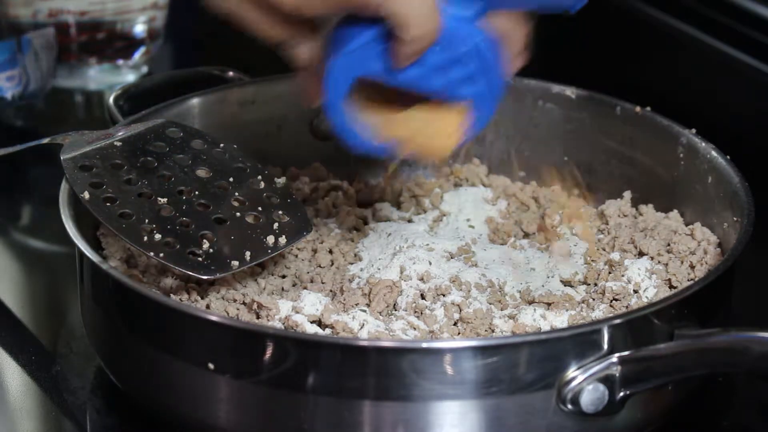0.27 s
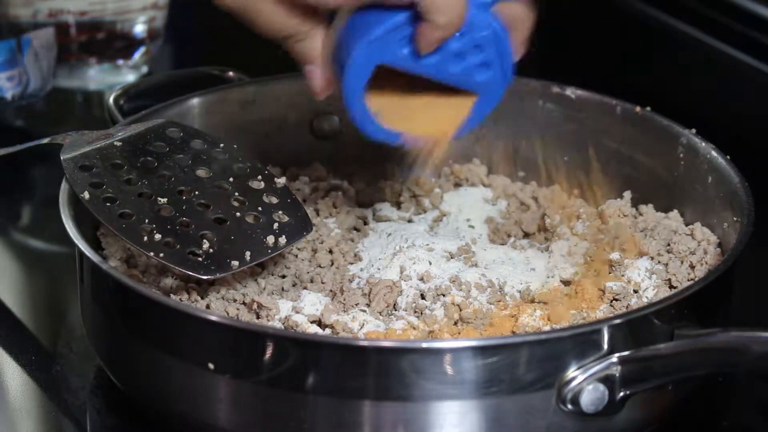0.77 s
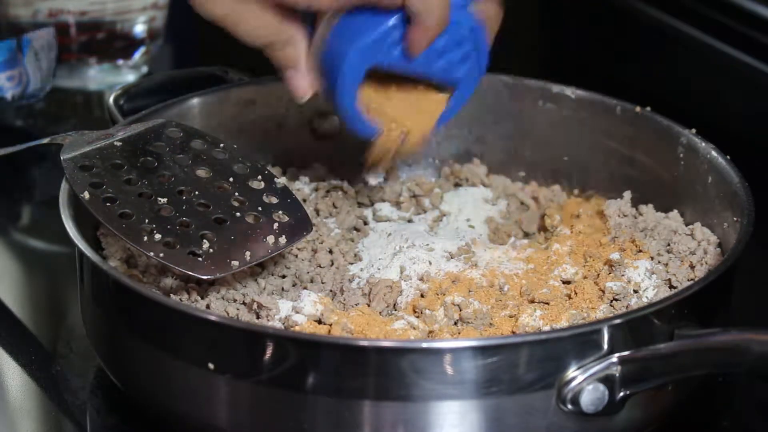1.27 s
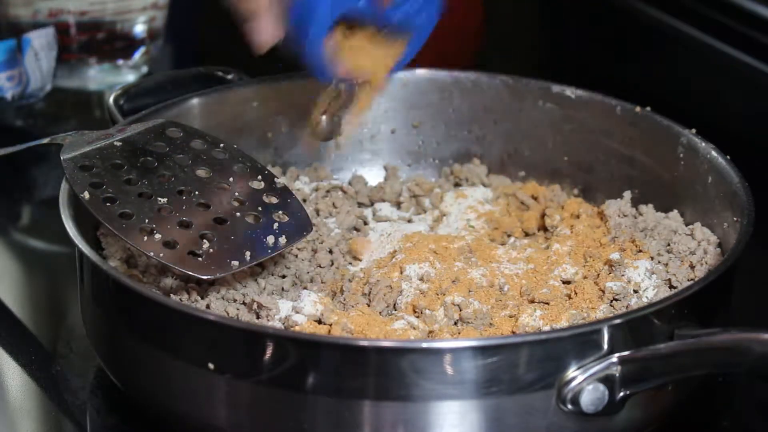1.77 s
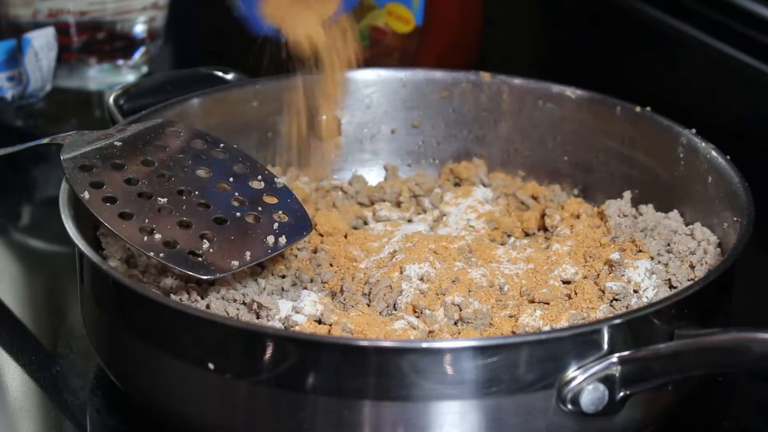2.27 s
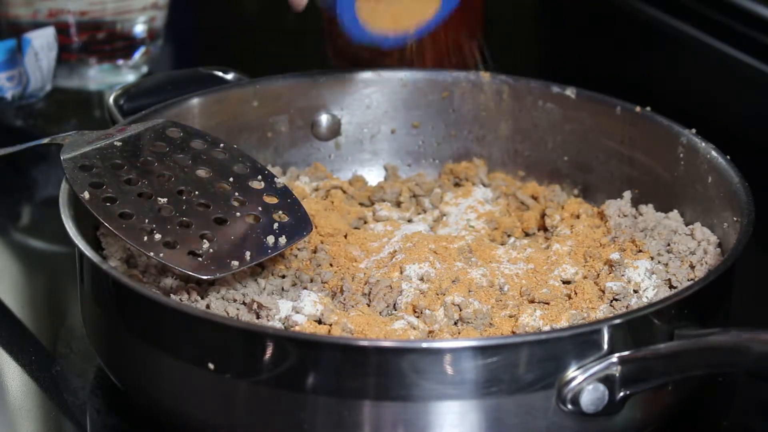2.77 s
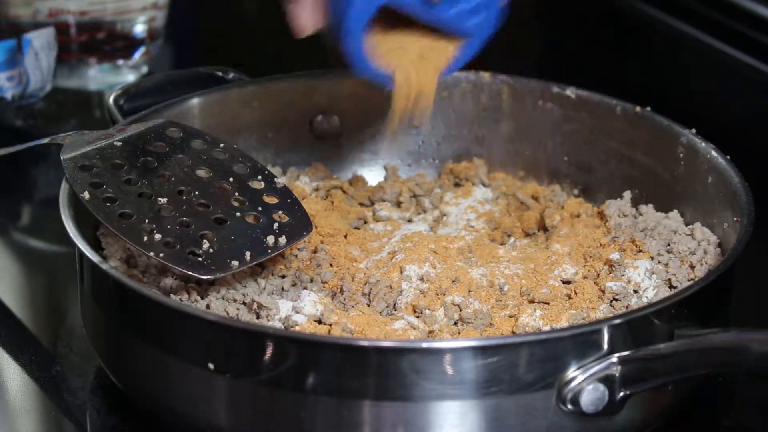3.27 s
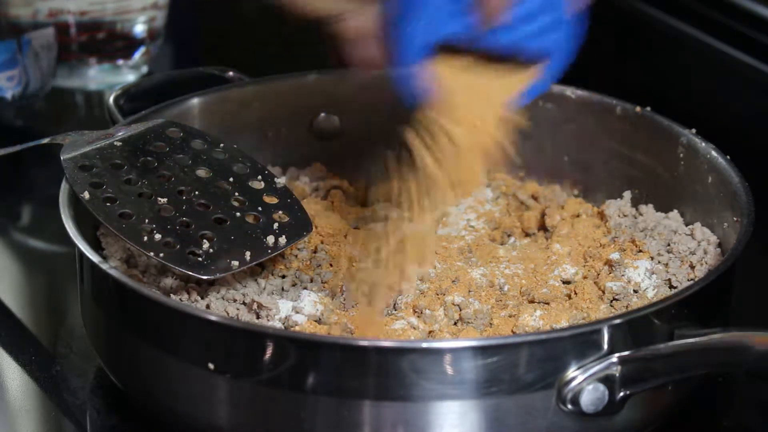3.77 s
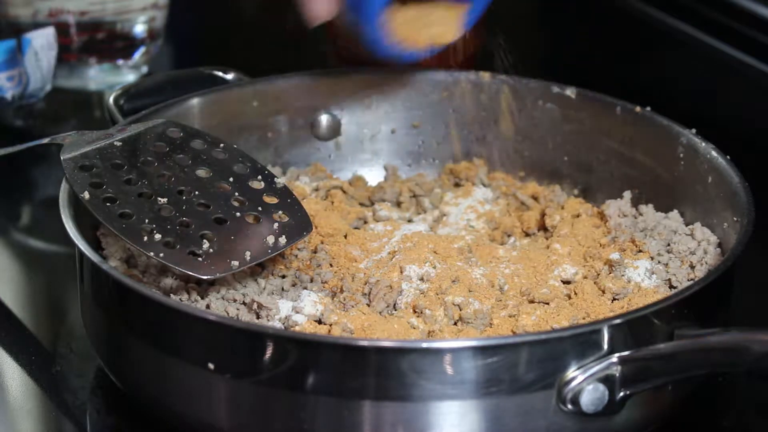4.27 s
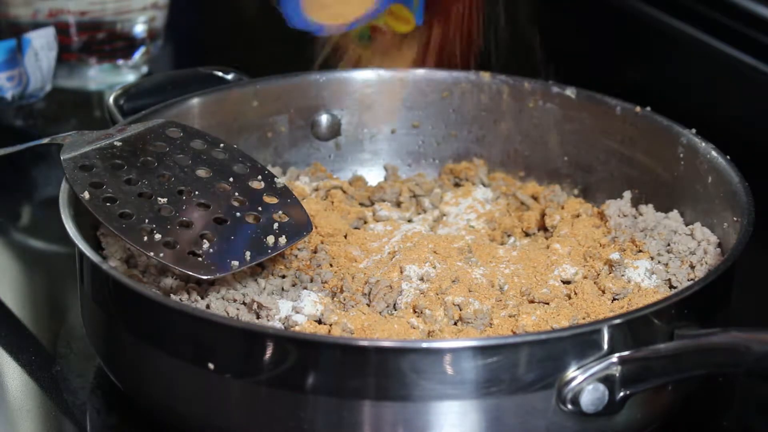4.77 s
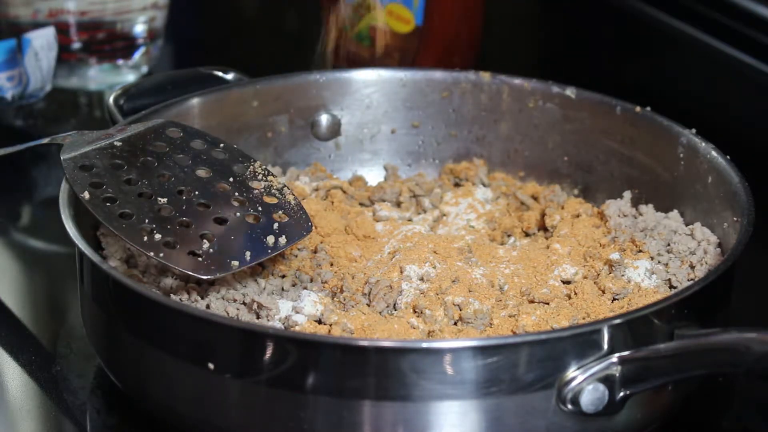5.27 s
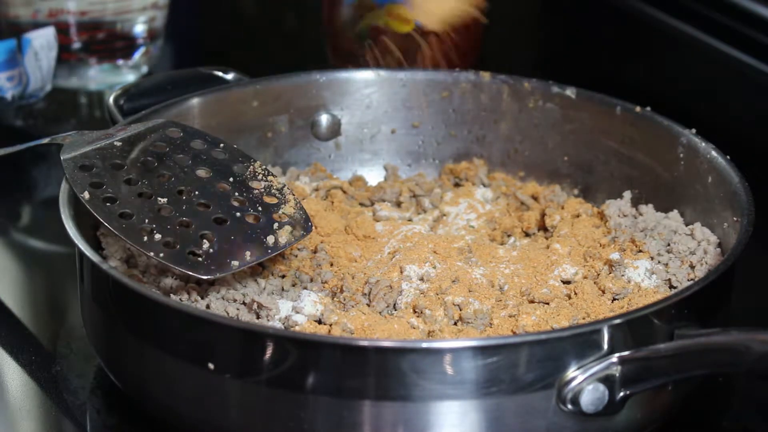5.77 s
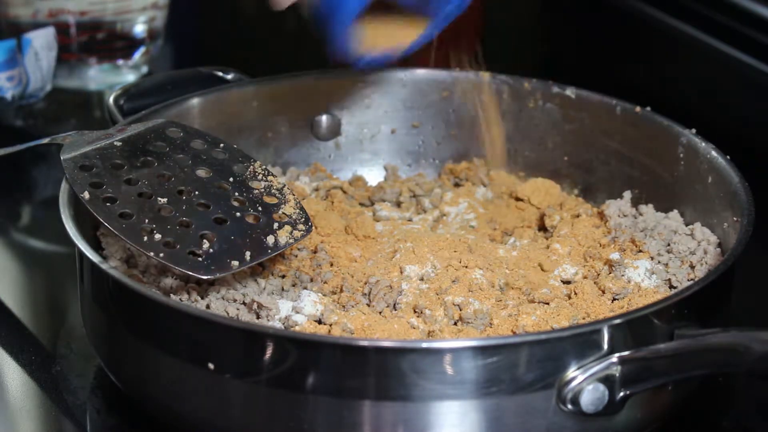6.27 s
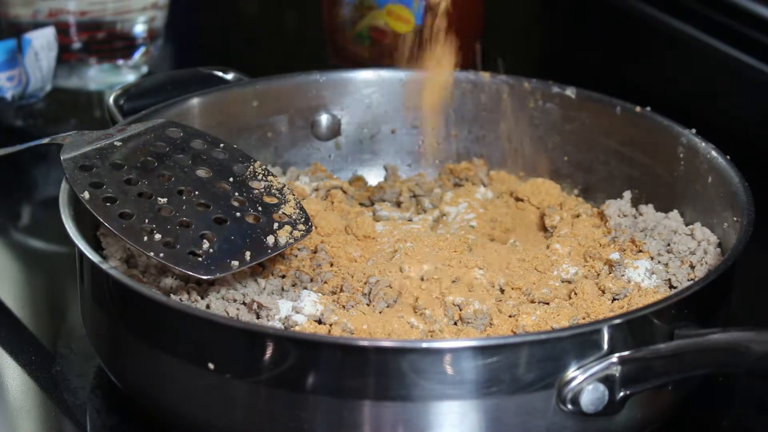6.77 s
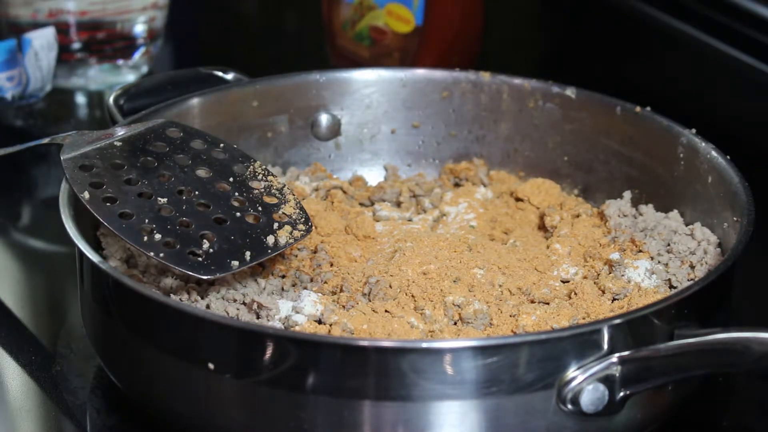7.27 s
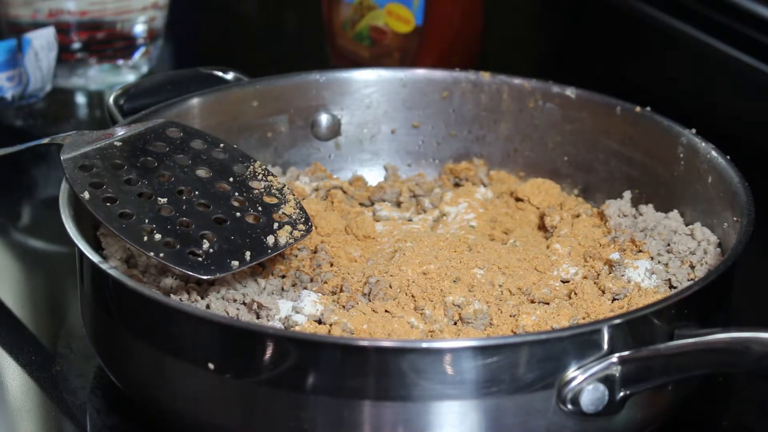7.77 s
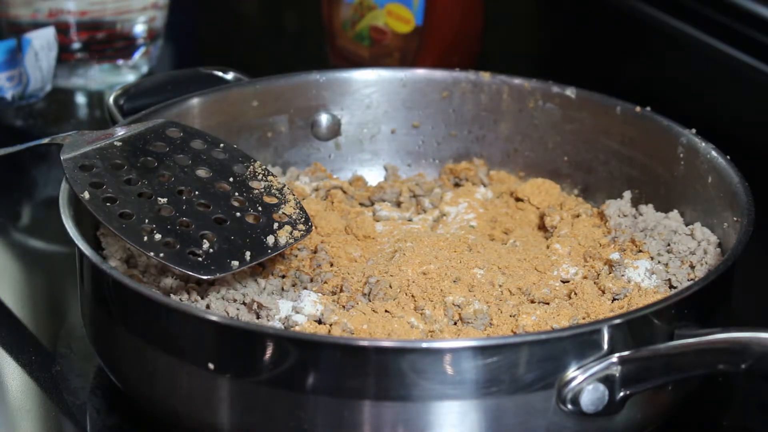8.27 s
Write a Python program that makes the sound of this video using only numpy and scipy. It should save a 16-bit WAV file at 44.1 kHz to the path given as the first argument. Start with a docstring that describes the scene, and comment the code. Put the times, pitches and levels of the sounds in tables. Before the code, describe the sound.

Close, centred sound in a small home kitchen with a low, slightly pulsing fan drone. Fine grains swish in a paper packet about nine times a second, bright and dry, with brief gaps, dull hand bumps and crackles. Later come irregular tips and squeezes, and the packet wall buckles with muted pops. Near the end a sudden overloaded double clack on metal rings briefly, then a heavy low rolling rumble.

```python
"""A kitchen fan hums throughout: coloured air noise, two beating hums and wavering tones.
From the start spice powder is shaken from a paper packet, about nine strokes a second: grain noise under
stroke envelopes, with dull bumps, crackling creases and, at 1.4 s, one tap of damped modes.
From 6.3 s tips and squeezes empty the packet; from 7.3 s it pops softly: short noise bands.
At 8.1 s a hard object clacks twice on metal, limited and clipped; a low rumble of merged bumps follows."""
import sys
import numpy as np
from scipy import signal
from scipy.fft import rfft, irfft, next_fast_len
from scipy.io import wavfile

SR = 44100
rng = np.random.default_rng(int(sys.argv[2]) if len(sys.argv) > 2 else 0)


def transcribe(u):
    """Save the signal u as a 16-bit wav file named by the first command-line argument.

    u: samples, shape (n,) or (channels, n), limited to [-1, 1]; the rate is SR.
    q: integer samples, one column per channel.
    """
    v = np.clip(np.atleast_2d(u).T, -1, 1)
    q = np.round(v * 32767).astype(np.int16)
    wavfile.write(sys.argv[1], SR, q)


N = 376173
TIME = np.arange(N) / SR


def amp(db):
    """Amplitude factor of a level in dB."""
    return 10 ** (np.asarray(db) / 20)


def unit(x):
    """Scales to an rms of one."""
    return x / np.sqrt(np.mean(x ** 2) + 1e-20)


def read(points, hz):
    """Interpolates a table on a log-frequency axis."""
    f, value = np.transpose(points)
    return np.interp(np.log(hz + 1), np.log(f + 1), value)


def colour(x, spectrum):
    """Filters x by a table of Hz and dB, to an rms of one."""
    size = next_fast_len(len(x))
    gain = amp(read(spectrum, np.fft.rfftfreq(size, 1 / SR)))
    return unit(irfft(rfft(x, size) * gain, size)[:len(x)])


def noise(spectrum, size=N):
    """Coloured noise of rms one."""
    return colour(rng.standard_normal(size), spectrum)


def add(mix, start_s, sound):
    """Mixes a sound in, cut at the end of the mix."""
    part = mix[round(start_s * SR):][:len(sound)]
    part += sound[:len(part)]


def drift(per_s):
    """A random curve of rms one that turns about per_s times a second."""
    return unit(np.interp(TIME * per_s, np.arange(4096), rng.standard_normal(4096)))


def grains(spectrum, per_s, spread_db):
    """A dense shower of tiny impacts of uneven size, rms one."""
    size = amp(spread_db * np.minimum(rng.exponential(1, N), 4)) * rng.standard_normal(N)
    hit = rng.random(N) < per_s / SR
    return colour(size * hit, spectrum)


def ring(modes):
    """One second of dying modes; neighbours start in opposite directions."""
    t = np.arange(SR) / SR
    out = np.zeros(SR)
    for k, (hz, db, t60_s) in enumerate(modes):
        decay = np.exp(-np.log(1000) * t / t60_s)
        out += (-1) ** k * amp(db) * decay * np.sin(2 * np.pi * hz * t)
    return out


# Fan air noise. Each row: frequency in Hz, density in dB per Hz (relative).
AIR_TONE = [(20, -11), (45, -6), (90, -10), (170, -2.5), (250, -3.5), (350, 1), (480, -1.5), (800, -7),
            (1300, -7.5), (1700, -15), (3200, -18.5), (4300, -23.5), (8000, -28), (15800, -31.5)]
# Fan tones. Each row: frequency in Hz, level in dB rms, unsteadiness from 0 to 1.
BLADE_TONES = [(117.5, -65, 0), (154, -65, 0.4), (206, -55.5, 0.23), (231.6, -61.5, 0.67), (297, -61, 0.91),
               (355, -58.5, 0.82)]
AIR_DB, SHAFT_DB, MAINS_DB = -47, -56.5, -62.5
MAINS_HZ, SLIP_HZ, IN_STEP_S = 60, 0.84, 0.87


def fan():
    """Rushing air with wavering blade tones; the shaft slips behind the mains, so the two hums beat."""
    out = amp(AIR_DB) * noise(AIR_TONE)
    for hz, db in [(MAINS_HZ - SLIP_HZ, SHAFT_DB), (MAINS_HZ, MAINS_DB)]:
        out += amp(db) * unit(np.cos(2 * np.pi * hz * (TIME - IN_STEP_S)))
    for hz, db, unsteady in BLADE_TONES:
        wander = (drift(hz / 25) + 1j * drift(hz / 25)) / np.sqrt(2)
        waver = np.sqrt(1 - unsteady ** 2) + unsteady * wander
        out += amp(db) * np.sqrt(2) * (waver * np.exp(2j * np.pi * hz * TIME)).real
    return out


def buckles(rows, rise_s, fade_s, span, settle_db=-13.0, settle_s=0.078, order=3):
    """The packet gives way with a hollow pop around each row's pitch, then rustles as it settles."""
    out = np.zeros(N)
    t = np.arange(SR // 4) / SR
    decay = np.exp(-t / fade_s) + amp(settle_db) * np.exp(-t / settle_s)
    shape = (1 - np.exp(-t / rise_s)) * decay
    shape /= shape.max()
    for s, db, hz in rows:
        band = signal.butter(order, [hz / span, hz * span], "band", fs=SR, output="sos")
        hollow = unit(signal.sosfilt(band, rng.standard_normal(len(t))))
        add(out, s, amp(db) * shape * hollow)
    return out


# Hand on the packet. Each row: start in seconds, level in dB, pitch in Hz.
HAND_BUMPS = [(.010, -38.5, 510), (.098, -41.5, 503), (6.533, -40, 463), (7.17, -49, 332)]


def bumps():
    """Dull bumps of the hand: narrow noise bands with a slower rise and fade than the pops."""
    return buckles(HAND_BUMPS, rise_s=0.0017, fade_s=0.011, span=1.166)


# Runs of even shaking. Each row: first stroke in seconds, last stroke in seconds, strokes per second,
# paper drive in dB relative to the powder drive.
SHAKING_RUNS = [(.033, 1.704, 8.3, 1), (1.824, 2.28, 9.4, -2), (2.592, 2.9, 9.7, 2),
                (3.028, 4.97, 9.3, -1.5), (5.06, 6.102, 8.6, -1)]
# How hard the hand shakes. Each row: time in seconds, powder drive in dB.
HAND_EFFORT = [(.2, -46), (.42, -49), (1.1, -48), (1.7, -51.5), (1.9, -49.5), (2.2, -57.5), (2.72, -53),
               (3.02, -56), (3.2, -48.7), (3.75, -49.5), (4.4, -52), (4.7, -49.5), (5.1, -62.5),
               (5.3, -54.5), (5.75, -54), (5.87, -60), (6.1, -54.5)]
THROW_DB = 1.58  # forward stroke this far above the effort, return stroke as far below
STROKE_HALF_S, STROKE_SPREAD_DB = 0.045, 0.25


def strokes():
    """The hand swings evenly back and forth; gives one row a stroke, with the columns of a squeeze."""
    times, paper_db = [], []
    for first_s, last_s, per_s, run_paper_db in SHAKING_RUNS:
        count = round((last_s - first_s) * per_s) + 1
        times.extend(np.linspace(first_s, last_s, count))
        paper_db.extend([run_paper_db] * count)
    effort_db = np.interp(times, *np.transpose(HAND_EFFORT))
    throw_db = np.resize([-THROW_DB, THROW_DB], len(times))
    chance_db = STROKE_SPREAD_DB * rng.standard_normal(len(times))
    drive_db = effort_db + throw_db + chance_db
    return [(s, db, STROKE_HALF_S, paper) for s, db, paper in zip(times, drive_db, paper_db)]


# Single tips and squeezes that empty the packet. Each row: centre in seconds, powder drive in dB,
# half length in seconds, paper drive in dB relative to the powder drive.
PACKET_SQUEEZES = [(6.304, -57.5, .049, 10.5), (6.502, -53, .09, 1.5), (6.628, -45, 0.042, -2.5),
                   (6.725, -51, .066, 5.5), (7.084, -56, .02, 7), (7.26, -50, 0.089, -1),
                   (7.387, -55.5, .13, 5.5), (7.566, -48, .04, -3), (7.668, -52.5, .08, 5.5),
                   (7.8, -61, .11, 6), (8.103, -55, 0.066, 9)]
# Powder sliding on paper. Each row: frequency in Hz, density in dB per Hz (relative).
POWDER_TONE = [(1000, -19), (3000, -9), (4500, -6), (5700, -2.5), (7000, -10), (9700, -16), (13000, -22),
               (15800, -30)]
# Spray of the fastest grains. Each row: frequency in Hz, density in dB per Hz (relative).
FIZZ_TONE = [(4000, -24), (7000, -2), (9700, 1), (13000, -3.5), (15800, -9)]
# Flexing packet wall. Each row: frequency in Hz, density in dB per Hz (relative).
PAPER_TONE = [(300, 3), (900, 2), (1800, 0), (2600, -1.5), (3500, -0.5), (4800, -7.5), (8000, -22)]


def shaking(slide_db=-4.0, wall_db=-3, fizz_db=-7, fizz_growth=0.25, usual_db=-49,
            sing_db=-14, sing_hz=5550, sing_width_hz=550, clump_db=1.0):
    """Each stroke or squeeze slides the powder along the packet and flexes its wall."""
    powder_power, paper_power = np.zeros((2, N))
    for s, db, half_s, paper_db in strokes() + PACKET_SQUEEZES:
        near = slice(max(round((s - 2 * half_s) * SR), 0), round((s + 2 * half_s) * SR))
        power = amp(db) ** 2 * np.exp(-2 * ((TIME[near] - s) / half_s) ** 2)
        powder_power[near] += power
        paper_power[near] += power * amp(paper_db) ** 2
    speed = np.sqrt(powder_power)
    slide = amp(slide_db) * grains(POWDER_TONE, per_s=9000, spread_db=1.5)
    # harder shakes throw more fine spray
    fizz_gain = amp(fizz_db + 0.64 * drift(11)) * (speed / amp(usual_db)) ** fizz_growth
    fizz = fizz_gain * grains(FIZZ_TONE, per_s=9000, spread_db=-2.5)
    # the paper's main resonance wanders as the packet bends
    lowpass = signal.butter(2, sing_width_hz / 2, fs=SR)
    fuzz = unit(signal.lfilter(*lowpass, rng.standard_normal(N)))
    turns = np.cumsum(sing_hz * (1 + 0.035 * drift(10))) / SR
    sing = amp(sing_db + 2.2 * drift(8.2)) * unit(fuzz * np.cos(2 * np.pi * turns))
    wall = amp(wall_db) * np.sqrt(paper_power) * grains(PAPER_TONE, per_s=4000, spread_db=-1.0)
    return (speed * (slide + fizz + sing) + wall) * amp(clump_db * drift(150))


# Loudest creases. Each row: start in seconds, level in dB, low paper share in dB relative to it.
CREASE_SNAPS = [(0.098, -48, 8), (.361, -41, -11), (2.544, -40, -7), (6.277, -45.5, 8.5), (6.532, -41.5, 2),
                (6.709, -43, 7), (7.394, -47, 8), (7.668, -42, -17), (7.705, -52.5, 13), (7.757, -51, 10),
                (7.804, -50, 5)]
SNAP_FADE_S = 0.0062
# faint creases, at random times until HANDLED_S
CREASE_COUNT, HANDLED_S, CREASE_DB, CREASE_PAPER_DB = 10, 7.9, -53.5, 1


def snaps(fizz_db=-3):
    """A crease gives way in a short burst of crackle."""
    crisp = unit(noise(POWDER_TONE) + amp(fizz_db) * noise(FIZZ_TONE))
    dull = noise(PAPER_TONE)
    high, low = np.zeros((2, N))
    fade = np.exp(-np.arange(SR // 8) / SR / SNAP_FADE_S)
    faint_s = rng.uniform(0, HANDLED_S, CREASE_COUNT)
    faint = [(s, CREASE_DB, CREASE_PAPER_DB) for s in faint_s]
    for s, db, paper_db in CREASE_SNAPS + faint:
        add(high, s, amp(db) * fade)
        add(low, s, amp(db + paper_db) * fade)
    return high * crisp + low * dull


# Tap modes. Each row: frequency in Hz, relative level in dB, t60 in seconds.
TAP_MODES = [(680, -20, 0.0065), (1684, -2.5, 0.025), (2000, -5.5, .018), (2290, -6.5, 0.011),
             (5800, -18, 0.0053), (11200, -29, .016)]
TAP_S, TAP_GAIN_DB = 1.4095, -17.5


def tap():
    """One small, well damped knock."""
    out = np.zeros(N)
    add(out, TAP_S, amp(TAP_GAIN_DB) * ring(TAP_MODES))
    return out


# Packet wall buckling. Each row: start in seconds, level in dB.
WALL_POPS = [(7.268, -38), (7.333, -43.5), (7.403, -34.5), (7.487, -33), (7.552, -40), (7.630, -36),
             (7.804, -41.5)]
POP_HZ, POP_USUAL_DB, POP_OCTAVES_PER_DB = 1230, -37.5, 0.025


def pops():
    """The packet's wall buckles; a harder pop is higher."""
    rows = [(s, db, POP_HZ * 2 ** (POP_OCTAVES_PER_DB * (db - POP_USUAL_DB))) for s, db in WALL_POPS]
    return buckles(rows, rise_s=0.00085, fade_s=0.0042, span=1.59)


# Clack and rebound. Each row: start in seconds, gain in dB, brightness in Hz, low thud gain in dB.
CLACK_BLOWS = [(8.0967, 1, 14000, -8), (8.131, 4.5, 10500, -17)]
# Contact crack, countless short modes. Each row: frequency in Hz, density in dB per Hz (relative).
CRACK_TONE = [(100, -14), (400, -10), (700, -27), (900, -14), (1200, -2.5), (1600, 0), (2100, 2),
              (2500, -4), (3300, 4), (4500, -8), (5600, -3), (6500, -10), (8000, -8), (10500, -11.5),
              (12500, -26), (15800, -27)]
# Low thud. Each row: frequency in Hz, relative level in dB, t60 in seconds.
THUD_MODES = [(395, -3, 0.035), (680, 1, 0.0096), (1220, -10, 0.037)]
# Struck metal. Each row: frequency in Hz, relative level in dB, t60 in seconds.
METAL_MODES = [(915, -35.5, 0.55), (1275, -37, 0.37), (1480, -24, 0.22), (1543, -25, 0.22),
               (1550, -40, 0.26), (1590, -27, 0.23), (1780, -36, 0.25), (1920, -43, 0.27), (3100, -41, .33),
               (3270, -37, .33), (3420, -43, .3), (3553, -39, 0.37), (3830, -34, .33)]


def clacks(fade_s=0.0038, crack_db=-29.5, ring_db=-5, lowest_hz=230, beam=0.61, beam_hz=3000):
    """Two blows crack and ring the same metal; returns the sound to the microphone and into the room."""
    direct, spread = np.zeros((2, N))
    fade = np.exp(-np.arange(SR) / SR / fade_s)
    treble = signal.butter(1, beam_hz, "high", fs=SR)
    # radiated in all directions, the crack's peaks and dips even out
    even = colour(signal.unit_impulse(SR, SR // 1000), CRACK_TONE)
    for s, db, bright_hz, thud_db in CLACK_BLOWS:
        crack = unit(noise(CRACK_TONE, SR) * fade)
        # treble beams straight at the microphone
        crack = crack + beam * signal.lfilter(*treble, crack)
        body = amp(thud_db) * ring(THUD_MODES) + amp(ring_db) * ring(METAL_MODES)
        # a softer contact is duller
        contact = signal.butter(1, bright_hz, fs=SR)
        add(direct, s, amp(db) * signal.lfilter(*contact, amp(crack_db) * crack + body))
        add(spread, s, amp(db) * signal.lfilter(*contact, amp(crack_db) * even + body))
    # the clacks carry no deep bass
    return signal.lfilter(*signal.butter(2, lowest_hz, "high", fs=SR), [direct, spread])


# Something heavy rolling. Each row: time in seconds, level in dB.
ROLL_LEVEL = [(8.15, -47), (8.24, -44), (8.355, -45), (8.385, -36), (8.44, -38), (8.53, -42)]
# Its sound. Each row: frequency in Hz, density in dB per Hz (relative).
RUMBLE_TONE = [(30, -30), (70, -23), (105, 11), (150, -13), (210, 1), (320, -9.5), (700, -10),
               (1200, -10.5), (2600, -16), (5000, -22.5), (15000, -38)]


def rolling():
    """Many small bumps merge into a rumble."""
    s, db = np.transpose(ROLL_LEVEL)
    level_db = np.interp(TIME, s, db, left=-np.inf)
    return amp(level_db) * grains(RUMBLE_TONE, per_s=9000, spread_db=0.5)


# Kitchen decay. Each row: frequency in Hz, t60 in seconds.
KITCHEN_T60 = [(200, 0.14), (1500, 0.34), (4000, 0.38), (8000, 0.36), (15000, 0.47)]
# Kitchen reflection. Each row: frequency in Hz, relative level in dB.
KITCHEN_TONE = [(200, 2), (700, -5), (1500, 3.5), (2600, -3.5), (3400, -1), (4500, 4), (7000, -4.5),
                (10000, -4.5), (15000, -1.5)]


def room(x):
    """Sparse reflections of random sign, each band dying at its own speed."""
    taps = np.zeros(SR)
    slots = np.arange(SR // 300, SR - 20, 20)
    taps[slots + rng.integers(0, 20, len(slots))] = rng.choice([-1., 1.], len(slots))
    hz, t, bands = signal.stft(taps, SR, nperseg=256)
    decay = np.exp(-np.log(1000) * t / read(KITCHEN_T60, hz)[:, None])
    bands = bands * amp(read(KITCHEN_TONE, hz))[:, None] * decay
    tail = signal.istft(bands, SR, nperseg=256)[1]
    return signal.fftconvolve(x, tail / np.linalg.norm(tail))[:N]


MIC_HISS_DB = -57.5


def scene(packet_wet_db=-12, knock_wet_db=-11, tap_wet_db=-13.5, clack_wet_db=-1.55,
          width_db=-34, diffuse_db=-73):
    """All sources straight ahead; only mic hiss and a trace of room and fan air differ between the ears."""
    packet = shaking() + snaps()
    knocks = bumps() + pops()
    tapped = tap()
    clack, clack_spread = clacks()
    sent = amp(packet_wet_db) * packet + amp(knock_wet_db) * knocks
    sent += amp(tap_wet_db) * tapped + amp(clack_wet_db) * clack_spread
    mid = fan() + packet + knocks + tapped + clack + rolling() + room(sent)
    side = amp(width_db) * room(sent) + amp(diffuse_db) * noise(AIR_TONE)
    return np.array([mid + side, mid - side]) + amp(MIC_HISS_DB) * rng.standard_normal((2, N))


EDGE_HZ = 15900


def record(dry, limit_db=-8, slope=0.77, recover_db_per_s=150, attack_s=0.0068, ceiling=0.96):
    """A limiter ducks peaks with a lag; what still exceeds the ceiling clips; then the band limit."""
    peak_db = 20 * np.log10(abs(dry).max(0) + 1e-9)
    fall_db = TIME * recover_db_per_s
    held_db = np.maximum.accumulate(peak_db + fall_db) - fall_db
    over_db = np.maximum(held_db - limit_db, 0)
    lag = np.exp(-1 / (attack_s * SR))
    duck_db = slope * signal.lfilter([1 - lag], [1, -lag], over_db)
    clipped = np.clip(dry / amp(duck_db), -ceiling, ceiling)
    lowpass = signal.firwin(255, EDGE_HZ, window=("kaiser", 9), fs=SR)
    return signal.oaconvolve(clipped, lowpass[None], "same")


dry = scene()
out = record(dry)
transcribe(out)
```